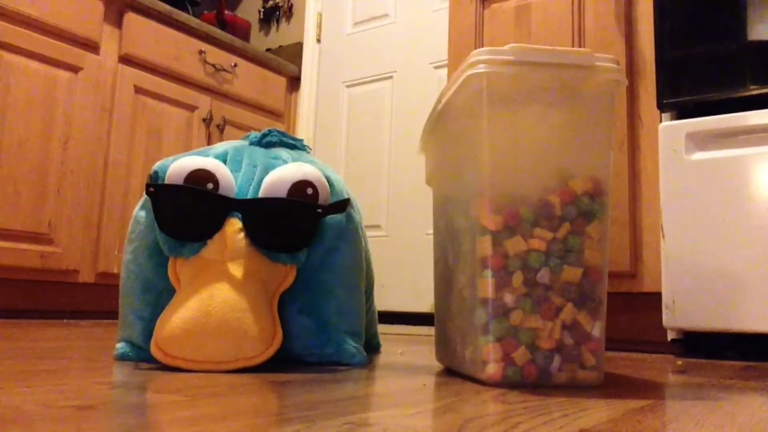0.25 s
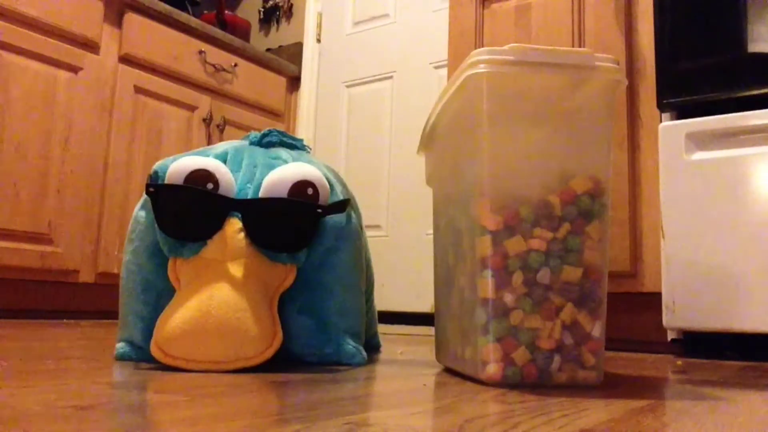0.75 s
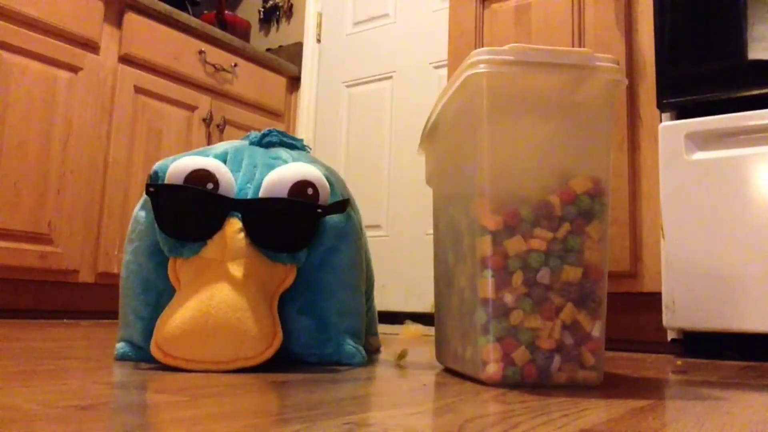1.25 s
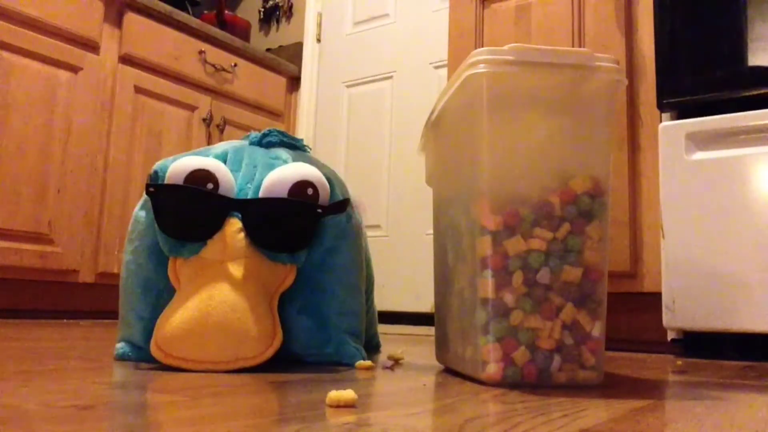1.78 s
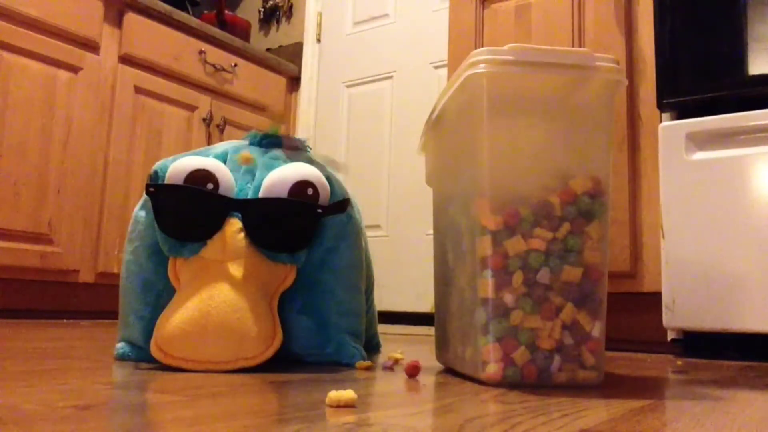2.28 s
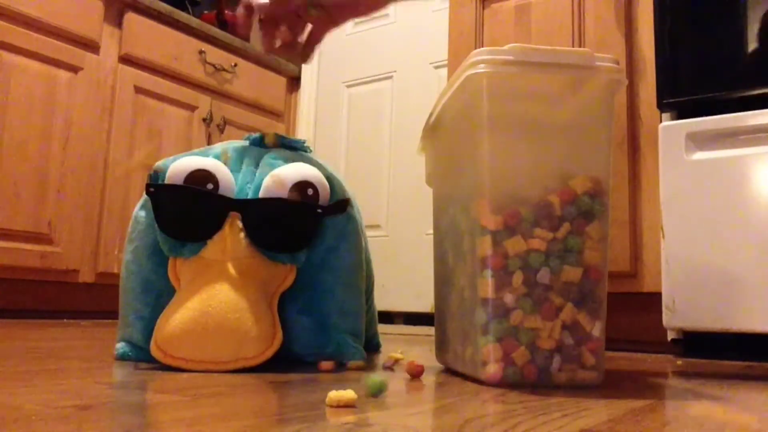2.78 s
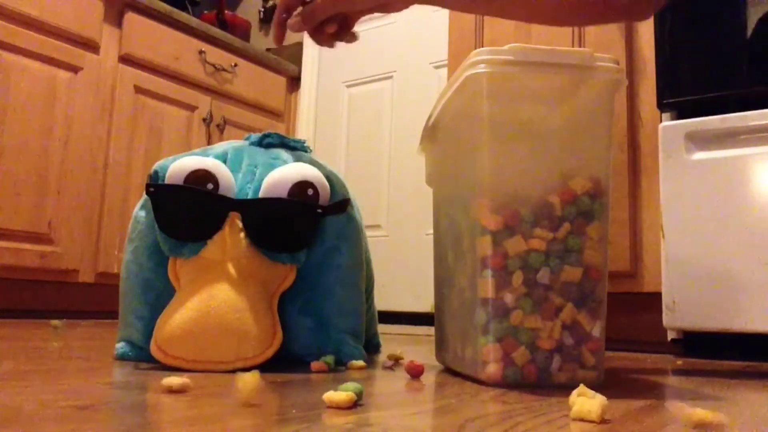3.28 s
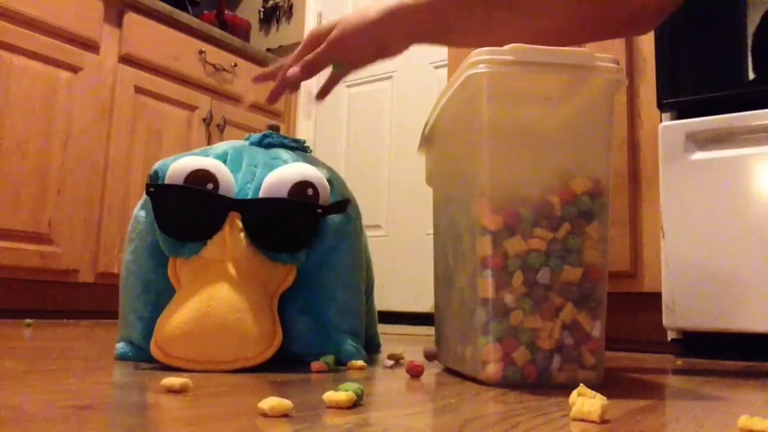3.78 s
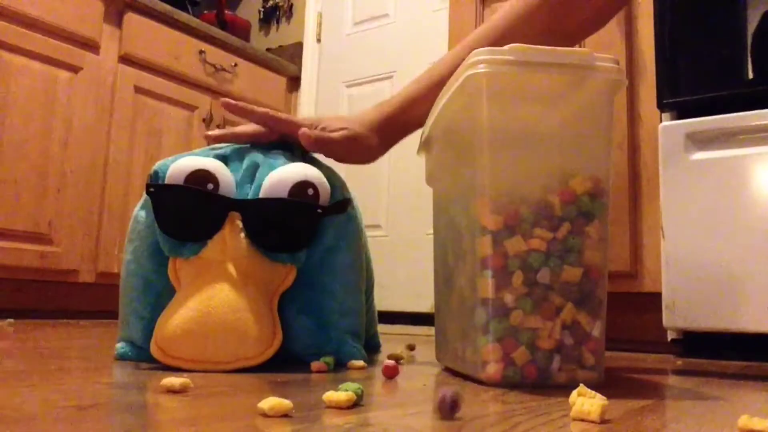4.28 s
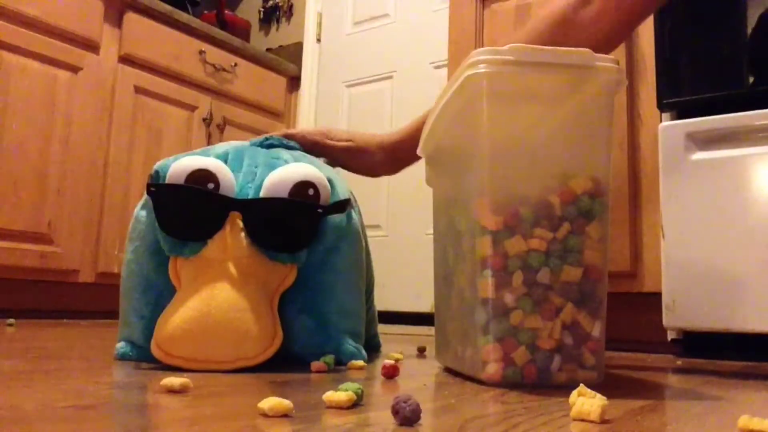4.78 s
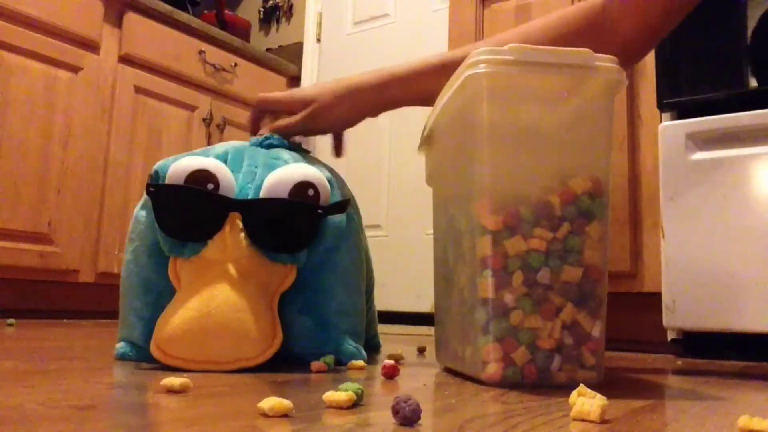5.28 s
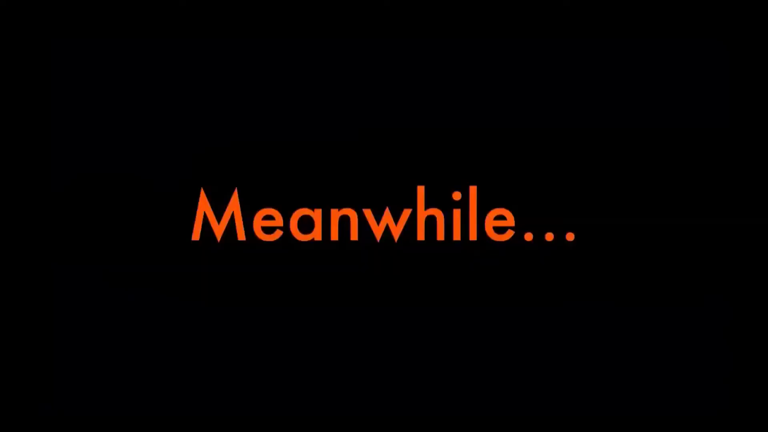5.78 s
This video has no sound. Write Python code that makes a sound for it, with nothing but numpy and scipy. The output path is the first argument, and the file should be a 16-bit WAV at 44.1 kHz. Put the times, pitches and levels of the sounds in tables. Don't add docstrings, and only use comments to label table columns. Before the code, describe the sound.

Close microphone on wooden boards: small hard crunchy pieces land with short hollow clicks, brittle ticks and soft woody knocks, first a loose cluster, then a thick rattling handful after a muffled bump. Lighter taps and faint rolling fade outward. Bright short reflections of an indoor kitchen surround them, a steady appliance hum lies beneath, and the end is a hard cut.

```python
import sys
import numpy as np
from scipy import signal
from scipy.fft import rfft, irfft
from scipy.io import wavfile
from scipy.ndimage import uniform_filter1d

SR = 44100
rng = np.random.default_rng(int(sys.argv[2]) if len(sys.argv) > 2 else 0)


def volts_from_db(level):
    exponent = np.asarray(level, float) / 20
    return 10 ** exponent


def wav_out(sig):
    wavfile.write(sys.argv[1], SR, np.round(np.clip(np.atleast_2d(sig).T, -1, 1) * 32767).astype(np.int16))


N = 266364

# f/Hz, level/dB
FRIDGE_LINES = [
    (117.45, -60),
    (235.1, -59),
    (352.55, -54),
    (120, -62),
]
# f/Hz, width/Hz, level/dB
FRIDGE_CABINET = (349, 51, -49)
# f/Hz, level/dB
AIR_SPECTRUM = [(25, -37.5), (60, -31.5), (95, -29), (160, -5), (230, -6.5), (300, -10.5), (440, -12),
                (960, -19), (1400, -26), (2000, -32.5), (3500, -38.5), (6500, -38.5), (10000, -39.5),
                (15500, -41.5)]
AIR_DB = -48
# t/s, level/dB
APPLIANCE_SWELL = [(0.0, -0.5), (5.57, -1.5)]
# t/s, level/dB
EARLIER_RATTLE = [(0, -54.5), (.2, -59.5), (0.449, -54.5), (.8, -88.5)]

# t/s, peak level/dB, piece f/Hz, board knock level/dB re peak, brittle tick level/dB re peak
FIRST_FEW = [(0.4704, -9.5, 3370, -13.5, -10.5), (0.6589, -12, 3640, -8.5, -32.5),
             (0.7893, -23.5, 2500, -2.5, -19), (0.8418, -33, 3380, -4, -23.5),
             (0.891, -25.5, 3070, -5, -27), (0.9044, -28, 2680, -14, -13), (0.9351, -27, 2970, -2.5, -26),
             (0.9617, -16, 3710, -8, -11), (0.9912, -20, 2440, -7.5, -12), (1.0312, -23, 2760, -15, -11.5),
             (1.0402, -34.5, 3300, 0, -26), (1.1266, -15, 3320, -10.5, -13), (1.1508, -32.5, 3400, -9, -3),
             (1.247, -28, 3200, -9, -29), (1.2594, -33, 4000, -8, -20), (1.2832, -24, 3000, -8.5, -14.5),
             (1.326, -34.5, 4560, -32, -15), (1.4092, -33.5, 4400, -22, -19),
             (1.5301, -36.5, 4540, -22, -18), (1.6825, -38.5, 4400, -15, -23),
             (1.8141, -22.5, 3120, -6, -11.5), (1.8975, -35, 2940, -11, -19), (1.9409, -36, 3450, -8, -14)]
HANDFUL_FALLS = [(2.341, -25.5, 2380, -2.5, -12), (2.3825, -26.5, 2667, -10, -21.5),
                 (2.3908, -28, 3020, -2, -8.5), (2.4467, -19, 3400, -2, -13.5),
                 (2.45, -20, 2860, -9, -14.5), (2.4609, -23.5, 3136, -4, -10.5),
                 (2.5463, -33, 3800, -4.5, -22), (2.5815, -22, 3170, -10, -21),
                 (2.6104, -31.5, 3570, -13, -18), (2.6461, -16.5, 3160, -12, -9.5),
                 (2.6923, -21, 3300, -16, -19), (2.7205, -13.5, 3330, -5, -12),
                 (2.7773, -23, 3800, -7.5, -11.5), (2.787, -24, 2780, -6, -27.5),
                 (2.8338, -25, 4900, -23, -5.5), (2.8374, -17.5, 3820, -22, -11.5),
                 (2.8426, -20, 3795, -7, -20.5), (2.849, -21.5, 3330, -15, -10),
                 (2.8975, -23, 3040, -12, -25.5), (2.9031, -20.5, 3600, -9.5, -24.5),
                 (2.9447, -19.5, 3400, -16, -8), (2.9579, -13.5, 3600, -15, -23.5),
                 (2.9864, -18, 3300, -15, -12.5)]
HANDFUL_SCATTERS = [(2.9965, -23.5, 3300, -18, -16.5), (3.008, -18, 3800, -15.5, -9),
                    (3.02, -22.5, 4400, -22, -25), (3.0281, -26.5, 3334, -10, -22.5),
                    (3.06, -22.5, 3870, -14, -16), (3.099, -25, 3330, -19, -11),
                    (3.1096, -34, 3840, -3.5, -2.5), (3.1216, -37.5, 4230, -6, -10.5),
                    (3.1387, -34.5, 4280, -4, -8), (3.1789, -26.5, 3420, -18, -11.5),
                    (3.2316, -25.5, 4140, -13.5, -9.5), (3.2376, -36.5, 3040, -2.5, -28),
                    (3.27, -34, 3760, -25, -26), (3.2804, -30, 4170, -33, -11),
                    (3.339, -36.5, 3850, -28, -15), (3.3624, -33, 3870, -27, -26),
                    (3.4146, -35, 4020, -11, -27)]
STRAGGLERS = [(3.6571, -29, 3030, -5, -12), (3.682, -19, 3500, -7.5, -17), (3.7895, -32.5, 3170, -7.5, -11),
              (3.8304, -30.5, 3270, -10.5, -19), (3.9117, -29.5, 3520, -4, -13),
              (3.9723, -34, 3140, -5.5, -25), (4.0222, -34, 2870, -10.5, -16),
              (4.039, -21, 3800, -8.5, -28.5), (4.0589, -15, 3220, -14.5, -23.5),
              (4.1874, -37.5, 3810, -23, -29.5), (4.218, -35.5, 3300, -10, -20),
              (4.2428, -29.5, 3540, -6, -27)]
# t/s, peak level/dB, piece f/Hz
EARLY_TAPS = [(0.8306, -39, 2550), (1.0666, -36, 2700), (1.1076, -32.5, 3700), (1.121, -34.5, 3080),
              (1.1587, -32, 3800), (1.2053, -35, 3770), (1.3602, -35, 3400), (1.3668, -39, 3300),
              (1.3844, -36, 3270), (1.422, -41, 3180), (1.4312, -40.5, 3860), (1.5025, -40, 4120),
              (1.5546, -45, 4300), (1.97, -42, 3260), (2.2439, -49.5, 2050), (2.4404, -37, 2420),
              (2.475, -33, 3070), (2.508, -33.5, 2986), (2.5353, -41, 3270), (2.5519, -32.5, 2860),
              (2.603, -32.5, 3086), (2.7078, -35.5, 3000), (2.748, -37.5, 3240), (2.878, -32, 3500),
              (2.883, -30, 3810), (2.9199, -31, 3500)]
LATE_TAPS = [(3.084, -35, 3800), (3.1296, -26.5, 4300), (3.1519, -38, 3370), (3.1697, -46, 3580),
             (3.1873, -37, 3940), (3.214, -41, 3150), (3.2748, -35, 3660), (3.284, -38, 3300),
             (3.2943, -47, 3800), (3.434, -40.5, 3930), (3.573, -44, 3850), (3.6122, -49, 3880),
             (3.7147, -39, 3800), (3.7622, -37, 2930), (3.963, -39, 3240), (4.1382, -38, 3400),
             (4.2348, -39, 3600), (4.2527, -41, 3080), (4.2721, -40, 3060), (4.2823, -42, 3880),
             (4.2914, -40, 3480), (4.49, -45, 3530), (4.53, -54, 3680), (4.691, -46, 3760),
             (4.7134, -51, 3800)]
# start t/s, length t/s, touch rate f/Hz, peak level/dB, piece f/Hz
ROLLS = [
    (.97, 0.28, 43, -37.5, 3350),
    (1.299, 0.47, 53.7, -49.5, 4000),
    (1.916, .07, 46, -41, 4000),
    (2.067, 0.51, 20, -50.5, 3500),
    (2.461, 0.96, 60, -40, 3300),
    (2.97, .33, 80, -40.5, 3760),
    (3.299, .21, 60, -46, 3860),
    (3.545, 0.097, 40, -48, 3700),
    (4.071, 0.31, 45, -44, 3600),
    (4.498, 0.19, 21.3, -52, 3600),
]
ROLL_FADE_DB, ROLL_SCATTER_DB, ROLL_PITCH_SPREAD = -5, 3.5, 0.14
TAP_HZ, TAP_KNOCK_DB, KNOCK_DB_PER_OCTAVE, TAP_TICK_DB = 3300, -8.5, -24, -20
TIP_S, TIP_DB = 0.0035, -9
# f/Hz, level/dB, decay t60/s, rise t/s
BOARDS = [(353, 0.5, 0.037, 0.0024), (500.6, -0.5, 0.038, 0.0035), (874, 0.5, 0.025, 0.0025),
          (1110, -2, 0.015, 0.0018), (1485, 9, 0.0048, 0.00044), (1993, -2, 0.022, 0.0008),
          (2596, -2, 0.015, 0.0013)]

WET_DB, WET_PER_PEAK_DB, WET_PER_TICK_DB = -3, -0.13, 0.2545
# t/s, extra room share level/dB
SCATTER_DISTANCE = [(.5, -1.5), (.66, -1.5), (.94, -7.5), (.96, 1), (1.3, 0.5), (2.3, 2.5), (2.35, -1),
                    (2.6, -1), (2.85, -0.5), (3.0, 0.5), (3.5, 0.5), (3.7, 1.5), (4.1, 1), (4.7, 3.5)]
# f/Hz, decay t60/s, level/dB
ROOM_TAIL = [(494, 0.16, -19), (1010, 0.23, -23.5), (1980, 0.18, -34.5), (3600, 0.38, -30),
             (5600, 0.42, -35), (9000, 0.13, -39.5), (13400, 0.073, -45.5)]
FLUTTER_S, FLUTTER_DB, FLUTTER_LOSS_DB = 0.0141, -8.5, -6

THUD_S, THUD_DB = 2.2425, -18
# f/Hz, level/dB, decay t60/s
THUD_MODES = [(113.5, -18, 0.33), (137, -12, 0.36), (168.8, -3, 0.24), (191, -10, 0.3), (246, -0.5, 0.1),
              (320, 3, 0.061), (524, -7, 0.038), (710, -16.5, 0.055)]
CUT_S, TOP_HZ = 5.5812, 15300


def coloured(hz, db, size):
    f = np.fft.rfftfreq(size, 1 / SR)
    gain = volts_from_db(np.interp(np.log(f + 1), np.log(hz), db))
    x = irfft(rfft(rng.standard_normal(size)) * gain, size)
    return x / x.std()


def band(x, lo_hz, hi_hz):
    sos = signal.butter(2, [lo_hz, min(hi_hz, 0.45 * SR)], "band", fs=SR, output="sos")
    return signal.sosfilt(sos, x)


def ring(t, hz, t60, rise):
    envelope = (1 - np.exp(-t / rise)) ** 2 * np.exp(-np.log(1000) * t / t60)
    return envelope * np.sin(2 * np.pi * hz * t)


def walk(rate):
    k = int(SR / rate)
    return uniform_filter1d(np.repeat(rng.standard_normal(N // k + 1), k), k)[:N]


def fridge():
    t = np.arange(N) / SR
    lines = sum(volts_from_db(db + 2.5 + 1.4 * walk(6.3)) * np.sin(2 * np.pi * hz * (t - 0.82))
                for hz, db in FRIDGE_LINES)
    hz, width, db = FRIDGE_CABINET
    boom = band(rng.standard_normal(N), hz - width / 2, hz + width / 2)
    boom = volts_from_db(db) * boom / boom.std()
    air = coloured(*np.transpose(AIR_SPECTRUM), size=N)
    rumble = signal.sosfilt(signal.butter(2, 2500, fs=SR, output="sos"), air)
    swell = volts_from_db(np.interp(t, *np.transpose(APPLIANCE_SWELL)) + 0.27 * walk(16))
    return lines + boom + volts_from_db(AIR_DB) * (air + (swell - 1) * rumble)


def earlier_rattle():
    level = np.interp(np.arange(N) / SR, *np.transpose(EARLIER_RATTLE))
    return volts_from_db(level) * band(rng.standard_normal(N), 1700, 4500)


def rolls():
    rows = []
    for start, length, rate, db, hz in ROLLS:
        luck = rng.standard_normal((32, 3))
        s = (np.arange(len(luck)) + 0.5 + 0.19 * luck[:, 0]) / rate
        peak_db = db + ROLL_FADE_DB * s / length + ROLL_SCATTER_DB * luck[:, 1]
        pitch = hz * (1 + ROLL_PITCH_SPREAD * luck[:, 2])
        rows += list(np.transpose([start + s, peak_db, pitch])[s < length])
    return rows


def landings():
    light = []
    for s, db, hz in EARLY_TAPS + LATE_TAPS + rolls():
        knock_db = TAP_KNOCK_DB + KNOCK_DB_PER_OCTAVE * np.log2(hz / TAP_HZ)
        light.append((s, db, hz, knock_db, TAP_TICK_DB))
    contacts = FIRST_FEW + HANDFUL_FALLS + HANDFUL_SCATTERS + STRAGGLERS + light
    s, peak_db, hz, knock_db, tick_db = np.transpose(contacts)[:, :, None]
    wet_db = WET_DB + np.interp(s, *np.transpose(SCATTER_DISTANCE))
    wet_db = wet_db + WET_PER_PEAK_DB * (peak_db + 16.5) + WET_PER_TICK_DB * (tick_db - TAP_TICK_DB)
    return s, peak_db, hz, knock_db, tick_db, wet_db


def hollow_click(t, hz, peak_db, knock_db, tick_db, luck):
    t60 = 0.0022 * volts_from_db(-0.25 * (peak_db + 10) + 0.7 * luck[:, :1])
    click = ring(t, hz, t60, 0.00013)
    click = click + volts_from_db(0.47 * knock_db) * ring(t, hz * 0.58, t60, 0.00054)
    return click + volts_from_db(4.5 + 0.67 * tick_db) * ring(t, hz * 1.7, t60, 0.0004)


def board_knock(t, knock_db, luck):
    knock = 0
    for k, (hz, db, t60, rise) in enumerate(BOARDS):
        spot_hz = hz * (1 + 0.063 * luck[:, [12 + k]])
        knock = knock + volts_from_db(db + 2.0 * luck[:, [4 + k]]) * ring(t, spot_hz, t60, rise)
    slap = band(np.sin(np.pi * np.minimum(t / 0.0003, 1)) ** 2, 700, 2600)
    return volts_from_db(knock_db + 4.0) * (knock + volts_from_db(-2.5) * slap)


def cereal():
    s, peak_db, hz, knock_db, tick_db, wet_db = landings()
    t = np.arange(4096) / SR
    luck = rng.standard_normal((len(s), 24))
    noise = rng.standard_normal((len(s), len(t)))
    click = hollow_click(t, hz, peak_db, knock_db, tick_db, luck)
    crack = band(noise * np.exp(-np.log(1000) * t / 0.016), 1700, 5500)
    tick = volts_from_db(tick_db + 5.5) * band(noise * np.exp(-np.log(1000) * t / 0.0022), 4000, 14170)
    knock = board_knock(t, knock_db, luck)
    piece = volts_from_db(14.5 + 0.23 * (peak_db + 7.0)) * click + volts_from_db(-4 - 0.044 * peak_db) * crack + tick + knock
    spike = 1.0 * (t == 0)
    snap = volts_from_db(13) * band(spike, 1300, 7000) + volts_from_db(tick_db + 25.0) * band(spike, 5400, 18000)
    spread = volts_from_db(wet_db) * (snap + volts_from_db(-17.5) * knock + volts_from_db(-28 - 0.32 * peak_db) * piece)
    near, far = np.zeros(N + len(t)), np.zeros(N + len(t))
    starts = ((s[:, 0] - 0.0006) * SR).astype(int)
    lags = (TIP_S * SR * volts_from_db(3 * luck[:, 1])).astype(int)
    tips = volts_from_db(TIP_DB - 0.4 * np.maximum(peak_db[:, 0] + 30, 0) + 3 * luck[:, 2])
    for at, db, direct, wet, lag, tip in zip(starts, peak_db, piece, spread, lags, tips):
        near[at + lag:at + len(t)] -= volts_from_db(db) * tip * direct[:-lag]
        near[at:at + len(t)] += volts_from_db(db) * direct
        far[at:at + len(t)] += volts_from_db(db) * wet
    return near[:N], far[:N]


def kitchen(x):
    t = np.arange(SR // 2) / SR
    tail = sum(volts_from_db(db - 60 * t / t60) * band(rng.standard_normal(len(t)), hz / 1.405, hz * 1.584)
               for hz, t60, db in ROOM_TAIL)
    rounds = np.arange(6)
    returns = np.zeros(len(t))
    returns[((rounds + 1) * FLUTTER_S * SR).astype(int)] = volts_from_db(FLUTTER_DB + FLUTTER_LOSS_DB * rounds)
    smear = rng.standard_normal(200) * np.exp(-np.arange(200) / 40) / 5
    flutter = band(np.convolve(returns, smear)[:len(t)], 4500, 11000)
    return signal.fftconvolve(x, tail * (1 - np.exp(-t / 0.00043)) + flutter)[:N]


def thud():
    t = np.maximum(np.arange(N) / SR - THUD_S, 0)
    return volts_from_db(THUD_DB) * sum(volts_from_db(db) * ring(t, hz, t60, 0.0041) for hz, db, t60 in THUD_MODES)


def scene():
    near, far = cereal()
    return (fridge() + earlier_rattle() + near + kitchen(far) + thud())[None]


def band_limit(x):
    return signal.sosfilt(signal.butter(12, 16500, fs=SR, output="sos"), x)


def record(dry):
    high_pass = signal.butter(2, 60, "high", fs=SR, output="sos")
    x = signal.sosfilt(high_pass, dry) + volts_from_db(-31.5) * dry
    x = signal.sosfiltfilt(signal.ellip(10, 0.2, 18, TOP_HZ, fs=SR, output="sos"), x)
    mix = x * (np.arange(N) < CUT_S * SR)
    return band_limit(mix)


dry = scene()
out = record(dry)
wav_out(out)
```